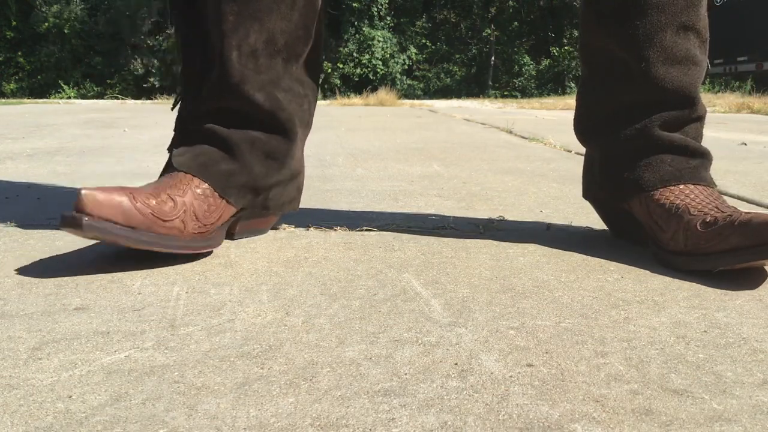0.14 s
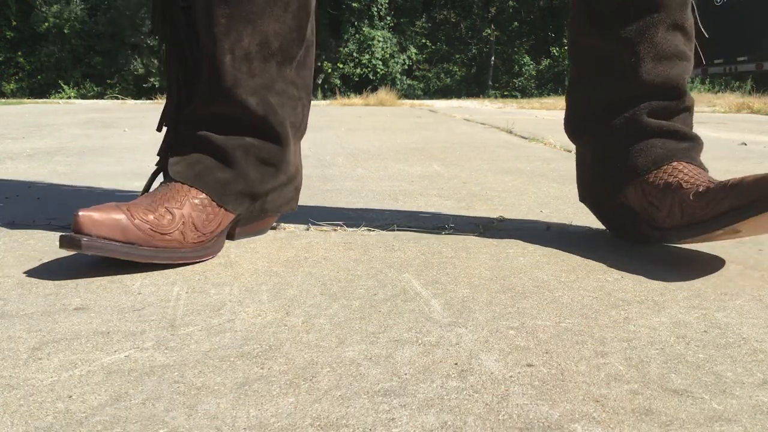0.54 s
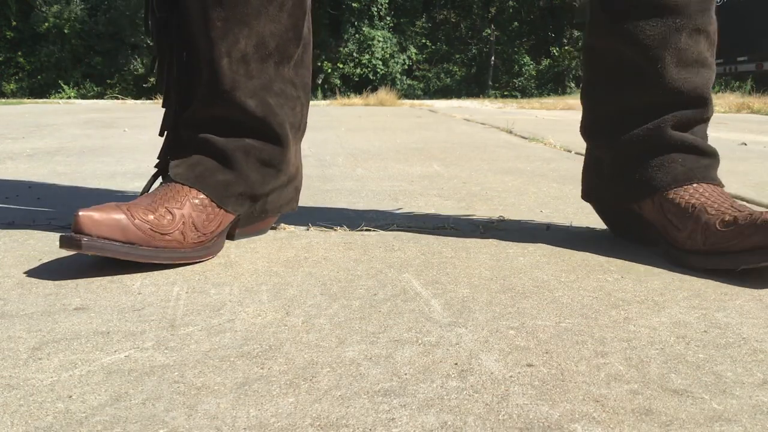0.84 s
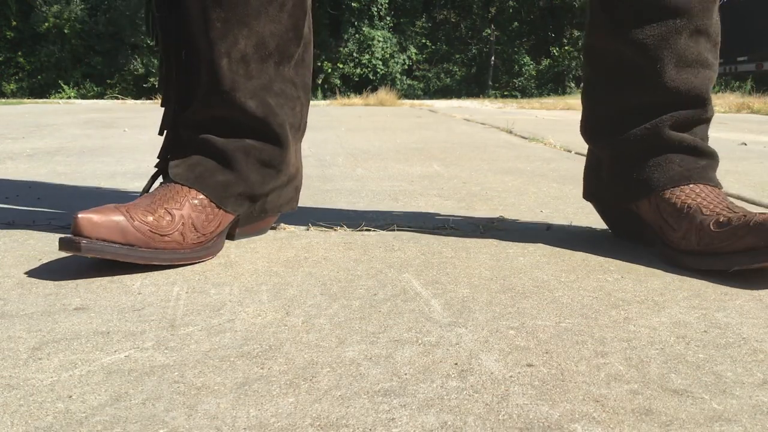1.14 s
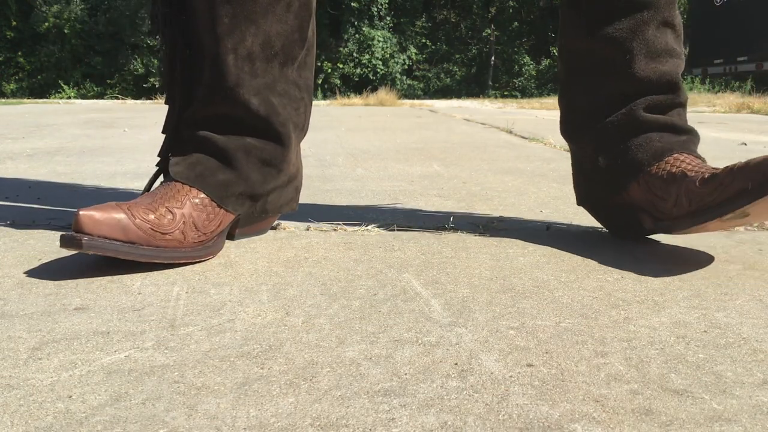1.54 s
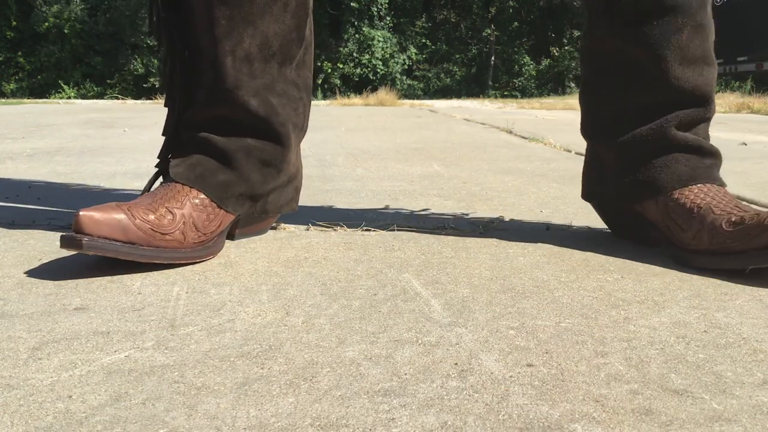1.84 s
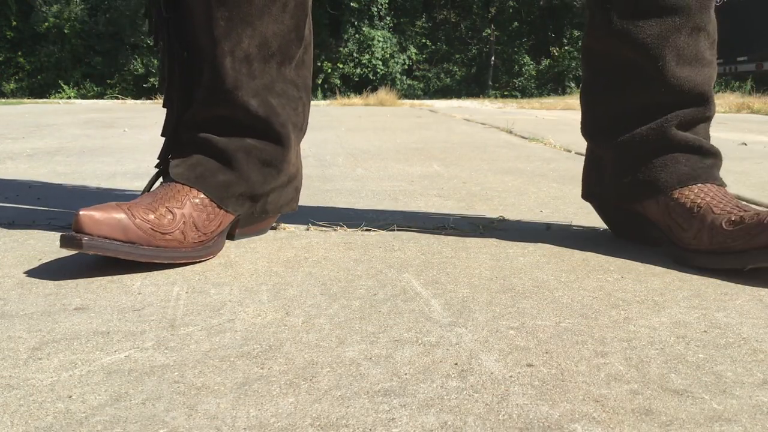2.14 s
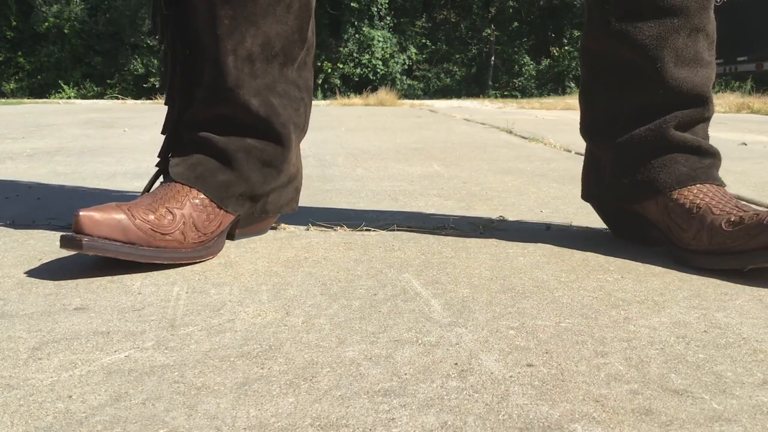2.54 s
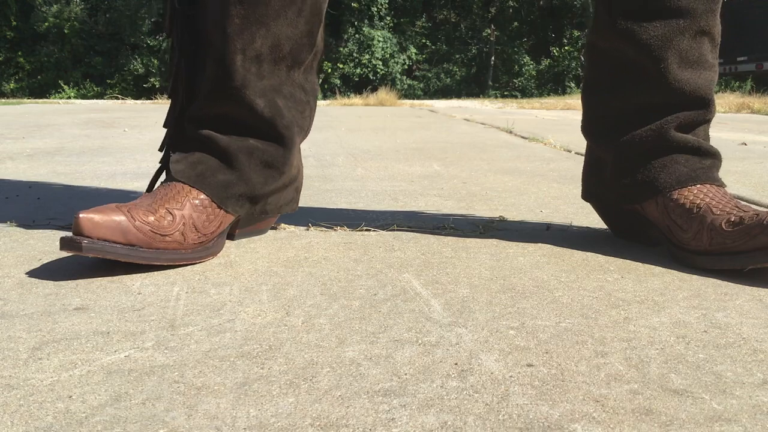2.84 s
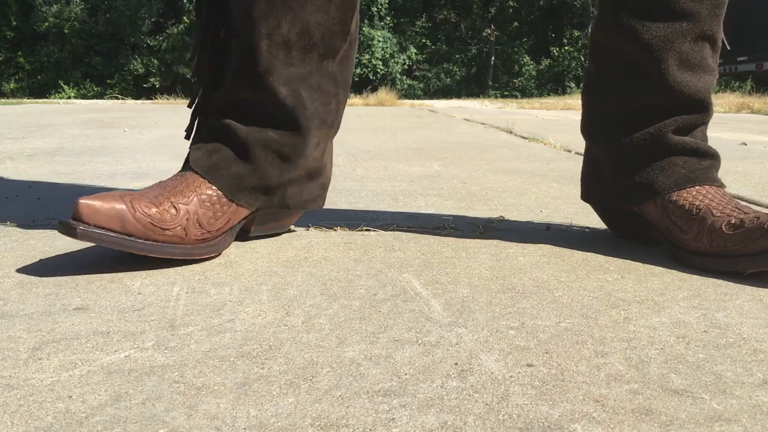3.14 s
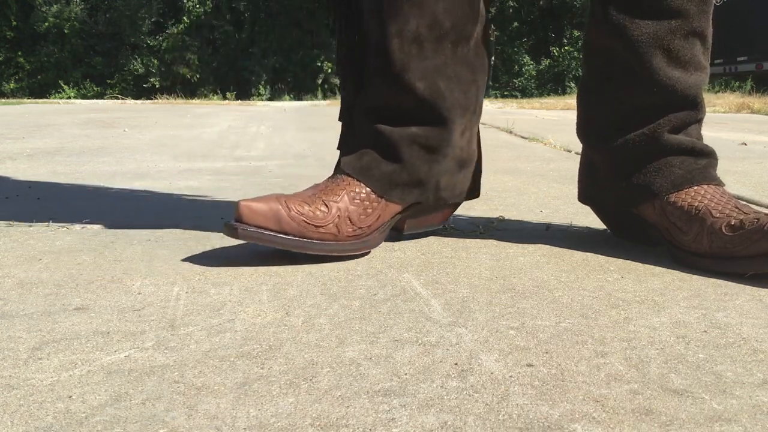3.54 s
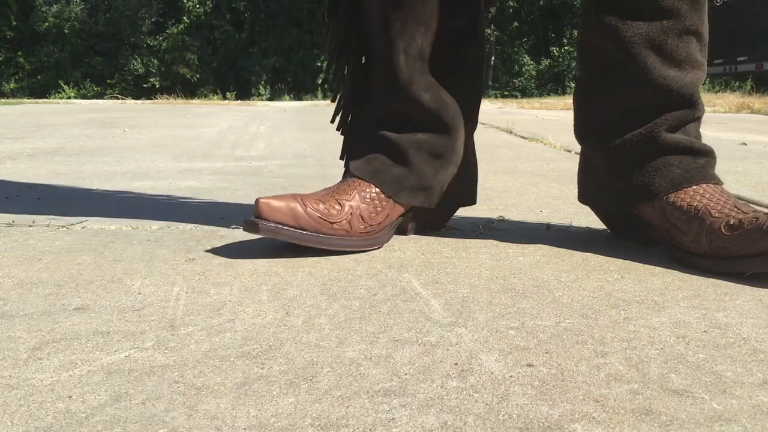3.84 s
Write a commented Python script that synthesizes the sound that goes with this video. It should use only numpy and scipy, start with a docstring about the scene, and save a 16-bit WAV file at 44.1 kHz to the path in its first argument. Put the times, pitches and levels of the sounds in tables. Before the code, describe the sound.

Hard boot soles tap on concrete four times, then a heel lands with a gritty crunch.

```python
"""A distant engine drone and a thin, steady whine hang in the outdoor air as hard boot soles
tap a concrete slab: four knocks, each sweeping quickly down in pitch because its bass lags.
Grit clicks underfoot, each grain snapping and sounding the sole, and fine sand scuffs softly.
Then one boot lifts and comes down on the grit with a crunch and a hollow ring of the heel."""
import sys
import numpy as np
from scipy.fft import rfft, irfft, next_fast_len
from scipy.io import wavfile
from scipy.ndimage import map_coordinates

SR = 44100
rng = np.random.default_rng(int(sys.argv[2]) if len(sys.argv) > 2 else 0)


def master_out(mix):
    """Clip the mix to full scale and print it as 16-bit PCM to the path in sys.argv[1]."""
    frames = np.transpose(np.atleast_2d(mix))
    ceiling = np.clip(frames, -1, 1)
    pcm = np.round(ceiling * 32767).astype(np.int16)
    wavfile.write(sys.argv[1], SR, pcm)


N = 175959

# tone of the outdoor air (frequency [Hz], level [dB])
AIR_COLOUR = [(36, -22), (50, -15), (72, -4), (95, -3.5), (135, -7.5), (220, -12), (400, -14.5), (740, -17),
              (950, -24), (1500, -31.5), (3000, -30.5), (5000, -33.5), (10000, -34.5), (12500, -41.5),
              (16000, -62)]
# fader ride of the far engine (time [s], level [dB])
DRONE_FADER = [(0.0, -37.5), (0.03, -40), (0.54, -38.5), (0.71, -42.5), (0.74, -40), (0.8, -45.5),
               (1.34, -45.5), (1.4, -42.5), (1.89, -53), (2.0, -57.5), (2.28, -46.5), (2.91, -42),
               (3.06, -46), (3.99, -41)]
# partials of the whine, each tuned to the nearest harmonic (frequency [Hz], level [dB])
WHINE_PARTIALS = [(5534, -85), (5744, -71.5), (5809, -81), (5959, -76), (6169, -72.5), (6385, -80),
                  (6595, -72.5), (6804, -79), (7020, -68.5), (7235, -71.5), (7445, -60.5), (7660, -64.5),
                  (7870, -55.5), (8086, -63.5), (8301, -75), (8511, -77.5), (8726, -62), (8931, -89),
                  (9152, -58.5), (9356, -72), (9577, -68), (9781, -94), (10002, -66), (10427, -67.5),
                  (10637, -93), (10853, -86), (11063, -77), (11278, -79), (11698, -95), (12129, -82),
                  (12554, -78)]
# pitch bend of the whine (time [s], pitch [ratio])
WHINE_BEND = [(0, .9991), (.6, 1), (3.62, 1), (3.75, .996)]
# fader rides of the whine's three bands (time [s], low [dB], middle [dB], high [dB])
WHINE_FADERS = [(0, 4, 1.5, 0), (.45, 1.5, -2.5, 0.5), (.7, -2.5, -2, -2.5), (.98, 0.5, 0, -0.5),
                (1.1, -1.5, -2, 1.5), (1.8, -3.5, -0.5, 0.5), (2.3, 1.5, -1, -1), (2.7, 0.5, 1.5, -0.5),
                (3.1, 2.5, -1, -4.5), (3.5, -1, -1, -2.5), (3.8, -7, -6, -4.5), (3.99, -5, -6, -1)]
# crossovers between those bands (lower [Hz], upper [Hz])
WHINE_CROSSOVERS = [6500, 8400]
# tone of the hiss around the whine (frequency [Hz], level [dB])
HISS_COLOUR = [(4500, -9.5), (6500, -5.5), (7800, 5.5), (9500, 1), (10500, -11), (13000, -25)]
# fader ride of that hiss (time [s], level [dB])
HISS_FADER = [(0, -56), (.9, -60.5), (1.6, -57.5), (2.4, -67), (3.99, -64)]
# soles rubbing over fine sand (time [s], length [s], level [dB])
SCUFF_CUES = [(.72, 0.15, -64), (1.08, .11, -65), (1.83, .08, -62), (2.985, 0.18, -56.5),
              (3.635, 0.11, -50), (3.7, 0.13, -65), (3.893, 0.13, -58.5)]
# tone of the sand (frequency [Hz], level [dB])
SAND_COLOUR = [(1000, 0), (4000, -6.5), (9000, 7), (12000, -5.5), (16000, -0.5)]
# grit cracking underfoot (time [s], level [dB], relative body [dB], relative crumble [dB])
GRIT_CUES = [(0.1949, -29, -11, 0), (.196, -29.5, 11, 2), (.2024, -37, -10, -5), (.2079, -30, -11, -10),
             (.6956, -34, -13, -15), (.8795, -43.5, 16, 5), (1.1001, -33, 9.5, 8), (1.104, -40, 0, 0),
             (1.1555, -39.5, 4.5, 3), (1.513, -40, -2, -2), (1.5492, -38, -6, 0), (1.7002, -26, 3, -15),
             (1.7854, -38, -4, -10), (1.8386, -31, -2, 1), (1.8392, -22.5, 3.5, 3), (1.8438, -31, 3, -3),
             (1.8925, -40.5, 6, 3), (2.5951, -34, -18, -10), (2.9555, -39, -20, -15),
             (2.9684, -28, -24, -17), (2.9883, -31.5, -20, -20), (3.0506, -48, 9, 0),
             (3.0585, -41, 11, -11), (3.6387, -21.5, 2.5, -5), (3.6406, -24, 3, -6),
             (3.643, -21.5, -4, -10), (3.6579, -27, -8, 0), (3.6654, -21.5, -13, 0), (3.6702, -17, -11, 5),
             (3.6707, -33, -10, 0), (3.6958, -14, -12, -10.5), (3.699, -19.5, -10, -6),
             (3.7094, -20.5, -13, -15), (3.7668, -41, -1, -10), (3.8, -27, 1.5, -2), (3.801, -32.5, 7, -10),
             (3.9304, -43, 5, -8), (3.967, -29, -2, 1)]
# tone of a cracking grain and of the sole it sounds (frequency [Hz], level [dB])
GRAIN_COLOUR = [(1000, -57), (4600, -19), (5600, -6), (6300, -7), (7300, 1.5), (8700, -1), (10200, 7.5),
                (11500, -2), (14000, 4.5), (16500, -9)]
BODY_COLOUR = [(300, -26), (1200, -12), (2000, -3.5), (2800, 0), (3800, 0), (4400, -9.5), (5000, -8),
               (9000, -28)]
# ringing modes of the heel (frequency [Hz], level [dB], 60 dB decay [s])
HEEL_MODES = [(285, -29, 0.089), (477, -38, 0.055), (1340, -30.5, 0.017), (2600, -36, .012),
              (3080, -37.5, .012), (4370, -37, 0.011)]
# taps of each boot (time [s], level [dB], bass lag [s], treble cutoff [Hz], relative tail [dB])
LEFT_CUES = [(.194, 25.5, 0.0097, 3560, -11), (3.639, 3, 0.0089, 2000, -2)]
RIGHT_CUES = [(.7348, 18.95, 0.011, 2900, -8), (1.096, 19.5, 0.0063, 1020, -14),
              (1.8363, 20.3, 0.0076, 3260, -11)]
# tone of each sole's knock (frequency [Hz], level [dB])
LEFT_COLOUR = [(40, -55), (100, -36), (160, -18), (230, -1), (300, 0.5), (450, -3.5), (540, -14), (740, -7),
               (920, -24.5), (1200, -15), (1750, -32), (2300, -18.5), (3400, -22.5), (4500, -31)]
RIGHT_COLOUR = [(40, -50), (85, -28), (160, -7), (220, -3.5), (340, 1), (450, -9), (560, -3.5), (750, -3.5),
                (950, -20.5), (1250, -12), (1500, -21), (1800, -11), (2200, -17), (2700, -20.5),
                (4500, -27)]
# dull tone of the scattered reflections and the heel's thump (frequency [Hz], level [dB])
TAIL_COLOUR = [(40, -22), (70, 2), (130, 3), (300, 4.5), (750, -1.5), (1100, -14), (2400, -21),
               (3600, -29.5), (12000, -30)]

AIR_DB = -52.5
DRONE_HZ, DRONE_SAG_HZ_PER_S = 171.5, 2.05
WHINE_HZ, WHINE_JITTER_HZ, WHINE_DRIFT_DB, WHINE_FLUTTER_DB = 212.77, 0.082, 1.57, 1.38
SAND_GRAINS_PER_S = 620
SNAP_T60_S, CRUMBLE_T60_S = 0.0038, 0.017
HEEL_S, HEEL_RISE_CYCLES, THUMP_DB, THUMP_T60_S = 3.6387, 1.34, -37.5, 0.11
SWEEP_HZ = 340  # the bass lag is halved at this pitch
TAIL_DELAY_S, TAIL_RISE_S, TAIL_T60_S = 0.013, 0.0022, 0.082
LOW_CUT_HZ, HIGH_CUT_HZ = 44, 16500


def amp(db):
    """Decibels to gain."""
    return 10 ** (np.asarray(db) / 20)


def unit(x):
    """Scale to rms 1."""
    return x / np.sqrt(np.mean(x ** 2) + 1e-20)


def colour(points):
    """An EQ curve through (frequency [Hz], level [dB]) points."""
    point_hz, db = np.transpose(points)
    return lambda hz: amp(np.interp(np.log(hz + 1), np.log(point_hz + 1), db))


def curve(rows):
    """An automation line through (time [s], value) rows."""
    return np.interp(np.arange(N) / SR, *np.transpose(rows))


def wobble(per_s):
    """A smooth random curve with per_s knots a second."""
    knots = rng.standard_normal(int(N * per_s / SR) + 4)
    return map_coordinates(knots, [np.arange(N) * per_s / SR])


def filtered(x, response):
    """Pass x through a complex frequency response."""
    size = next_fast_len(N + SR // 2)
    hz = np.fft.rfftfreq(size, 1 / SR)
    return irfft(rfft(x, size) * response(hz), size)[:N]


def noise(points):
    """Coloured noise of rms 1."""
    return unit(filtered(rng.standard_normal(N), colour(points)))


def swell(start, rise, t60):
    """An envelope with a quick attack and an exponential decay."""
    t = np.maximum(np.arange(N) / SR - start, 0)
    return (1 - np.exp(-t / rise)) * np.exp(-np.log(1000) * t / t60)


def add(track, start, sound):
    """Mix a short sound in at start seconds."""
    part = track[int(start * SR):][:len(sound)]
    part += sound[:len(part)]


def air():
    """A bed of soft outdoor rumble, barely wavering."""
    return noise(AIR_COLOUR) * amp(AIR_DB + 0.43 * wobble(per_s=3.13))


def engine_drone():
    """A far engine: one low tone that sinks slowly, fading and returning."""
    hz = DRONE_HZ - DRONE_SAG_HZ_PER_S * np.arange(N) / SR
    return amp(curve(DRONE_FADER)) * np.sin(2 * np.pi * np.cumsum(hz) / SR)


def whine():
    """High harmonics of one steady buzz, each drifting in level, in a band of hiss."""
    pitch_hz = WHINE_HZ * curve(WHINE_BEND) + WHINE_JITTER_HZ * wobble(per_s=12)
    cycles = np.cumsum(pitch_hz) / SR
    times, *faders = np.transpose(WHINE_FADERS)
    tones = np.zeros(N)
    for hz, db in WHINE_PARTIALS:
        band = np.searchsorted(WHINE_CROSSOVERS, hz)
        band_db = curve(np.transpose([times, faders[band]]))
        shimmer_db = WHINE_DRIFT_DB * wobble(per_s=2.06) + WHINE_FLUTTER_DB * wobble(per_s=14)
        harmonic = np.round(hz / WHINE_HZ)
        phase = 2 * np.pi * (harmonic * cycles + rng.random())
        tones += np.sqrt(2) * amp(db + band_db + shimmer_db) * np.sin(phase)
    return tones + noise(HISS_COLOUR) * amp(curve(HISS_FADER))


def scuffs():
    """Tiny sand grains tick under a sliding sole, fading in and out with each rub."""
    t = np.arange(N) / SR
    grains = (rng.random(N) < SAND_GRAINS_PER_S / SR) * rng.standard_normal(N)
    rub = np.zeros(N)
    for start, length, db in SCUFF_CUES:
        progress = np.clip((t - start) / length, 0, 1)
        rub += amp(db) * np.sin(np.pi * progress)
    return rub * unit(filtered(grains, colour(SAND_COLOUR)))


def grit():
    """Each grain snaps sharply, crumbles for a moment and sounds the sole."""
    cracks, body = np.zeros(N), np.zeros(N)
    t = np.arange(SR // 40) / SR
    for start, db, body_db, crumble_db in GRIT_CUES:
        snap, crumble = 0.5 * rng.standard_normal((2, len(t)))
        snap *= amp(-60 * t / SNAP_T60_S)
        crumble *= amp(crumble_db - 60 * t / CRUMBLE_T60_S)
        click = snap + crumble
        click[0] = 2  # a hard spike for the attack
        click *= 2.85 / np.linalg.norm(click)
        add(cracks, start, amp(db) * click)
        add(body, start, amp(db + body_db) * click)
    return filtered(cracks, colour(GRAIN_COLOUR)) + filtered(body, colour(BODY_COLOUR))


def heel():
    """The heel lands with a hollow ring and a dull thump; its low modes take longest to build."""
    t = np.arange(N) / SR - HEEL_S
    ring = np.zeros(N)
    for hz, db, t60 in HEEL_MODES:
        envelope = swell(HEEL_S, HEEL_RISE_CYCLES / hz, t60)
        ring += amp(db) * envelope * np.sin(2 * np.pi * hz * t)
    thump = amp(THUMP_DB) * swell(HEEL_S, TAIL_RISE_S, THUMP_T60_S) * noise(TAIL_COLOUR)
    return ring + thump


def boot_taps(cues, sole_colour):
    """A hard sole hits concrete: treble arrives first, bass lags, and a short dull tail follows."""
    track = np.zeros(N)
    for start, db, lag, cutoff_hz, tail_db in cues:
        blow = np.zeros(N)
        blow[int(start * SR)] = amp(db)
        sweep = lambda hz: np.exp(-2j * np.pi * lag * SWEEP_HZ * np.arctan(hz / SWEEP_HZ))
        # a higher cutoff also rolls off more steeply
        rolloff = lambda hz: 1 / np.sqrt(1 + (hz / cutoff_hz) ** (cutoff_hz / 260))
        knock = filtered(blow, lambda hz: colour(sole_colour)(hz) * rolloff(hz) * sweep(hz))
        tail = noise(TAIL_COLOUR) * swell(start + TAIL_DELAY_S, TAIL_RISE_S, TAIL_T60_S)
        track += knock + unit(tail) * knock.std() * amp(tail_db)
    return track


def scene():
    """The mono mix: boots up front; drone, whine and air behind."""
    knocks = boot_taps(LEFT_CUES, LEFT_COLOUR) + boot_taps(RIGHT_CUES, RIGHT_COLOUR)
    boots = knocks + grit() + scuffs() + heel()
    return (boots + engine_drone() + whine() + air())[None]


def record(dry):
    """Master EQ: roll off the deepest bass and cut the extreme top steeply."""
    low_cut = lambda hz: 1 - 1 / (1 + (hz / LOW_CUT_HZ) ** 6)
    high_cut = lambda hz: 1 / (1 + (hz / HIGH_CUT_HZ) ** 120)
    return filtered(dry[0], lambda hz: low_cut(hz) * high_cut(hz))[None]


dry = scene()
out = record(dry)
master_out(out)
```